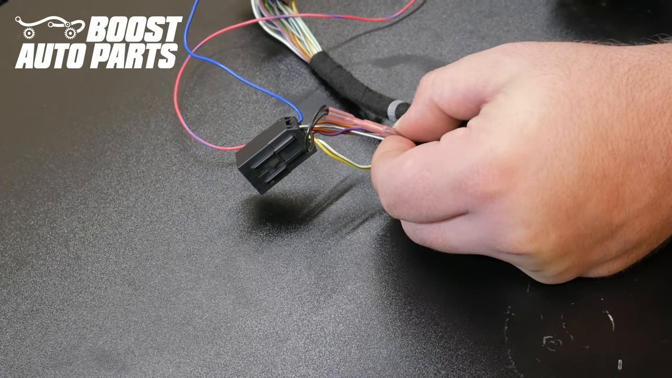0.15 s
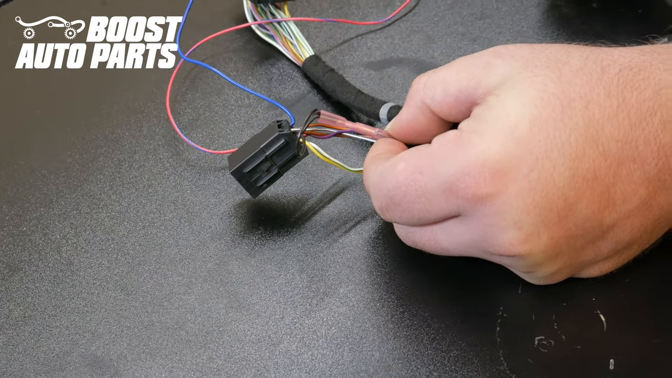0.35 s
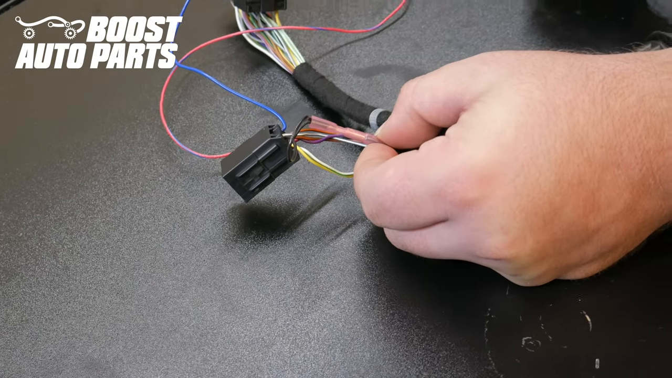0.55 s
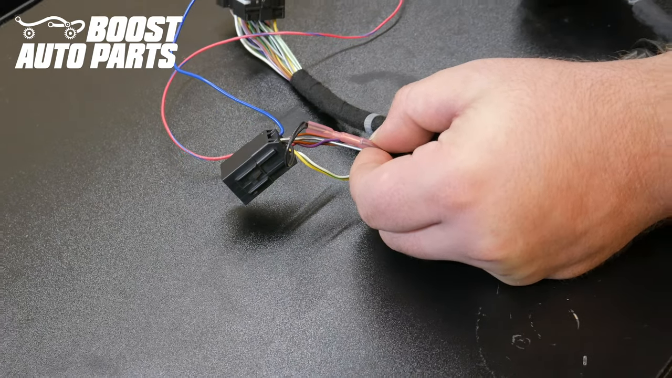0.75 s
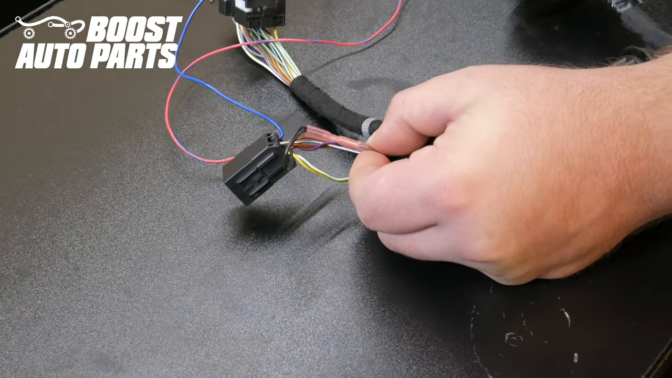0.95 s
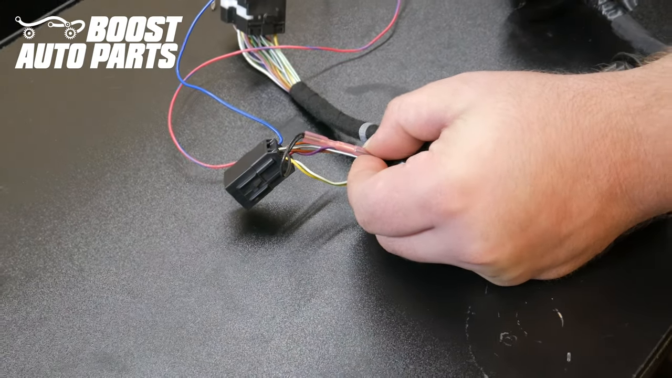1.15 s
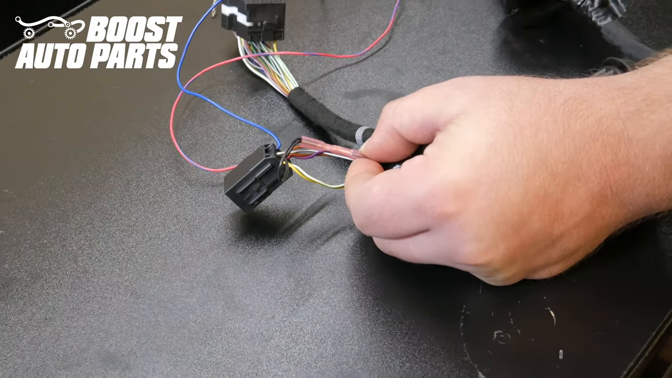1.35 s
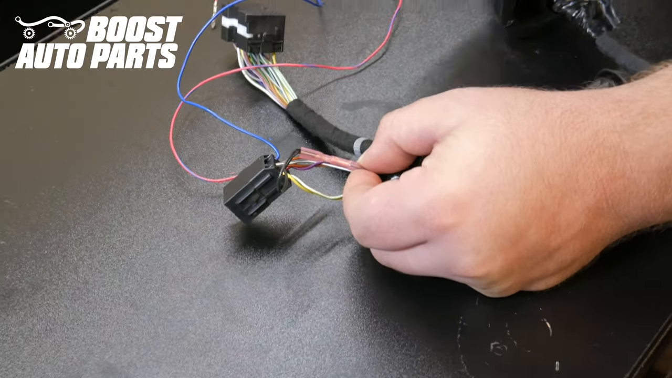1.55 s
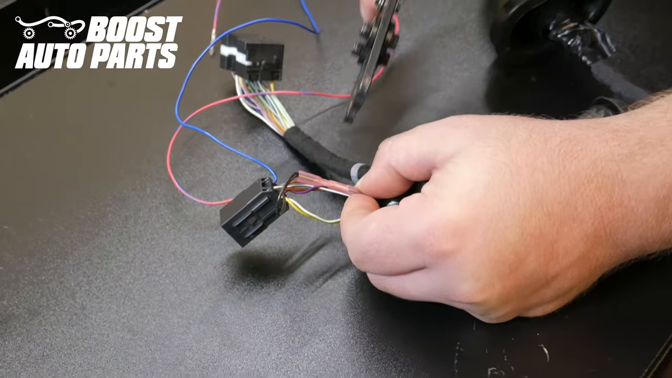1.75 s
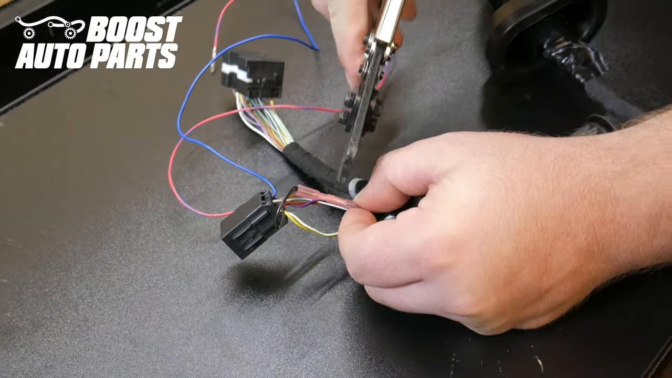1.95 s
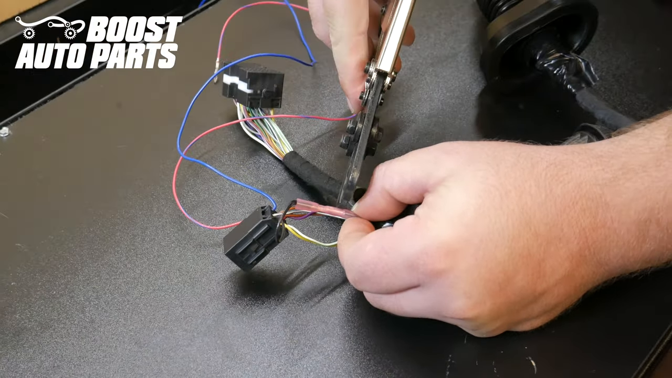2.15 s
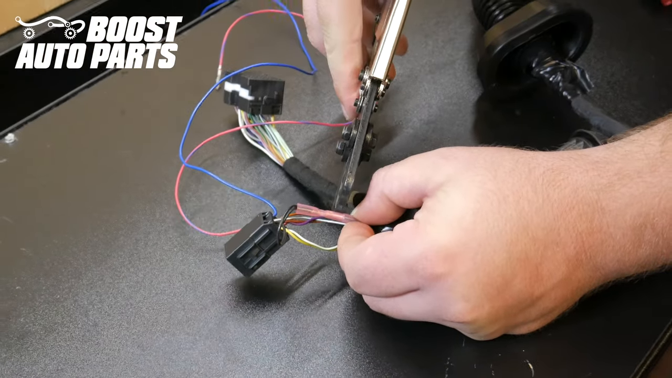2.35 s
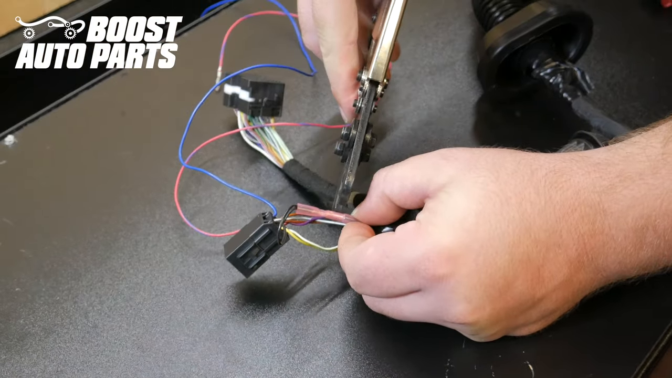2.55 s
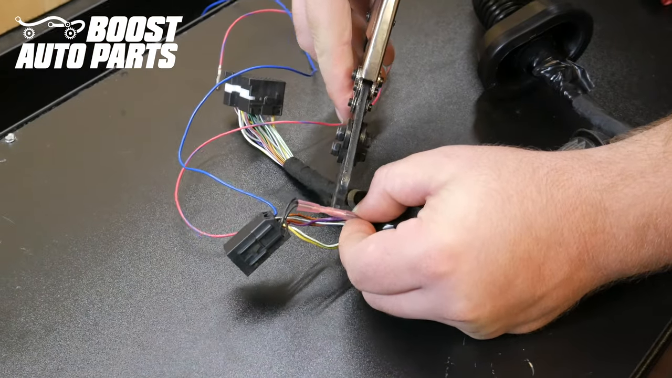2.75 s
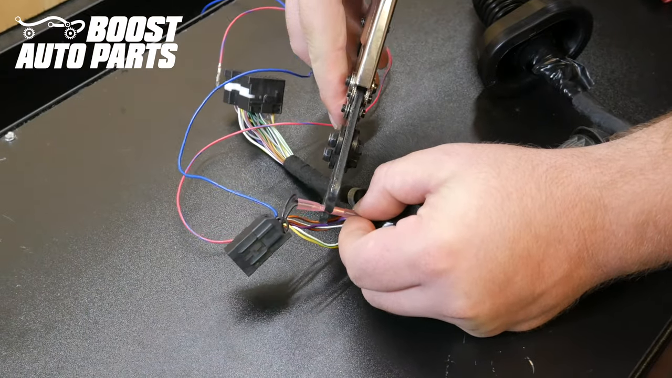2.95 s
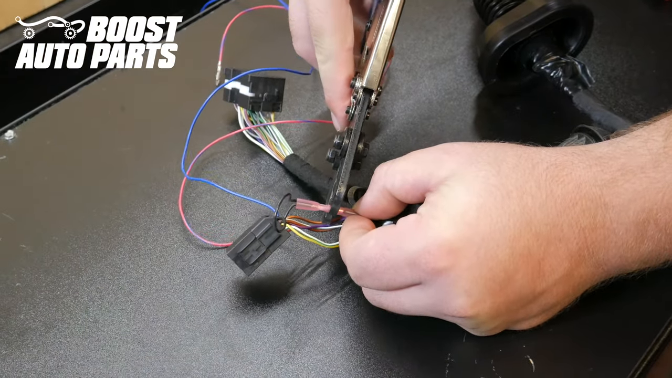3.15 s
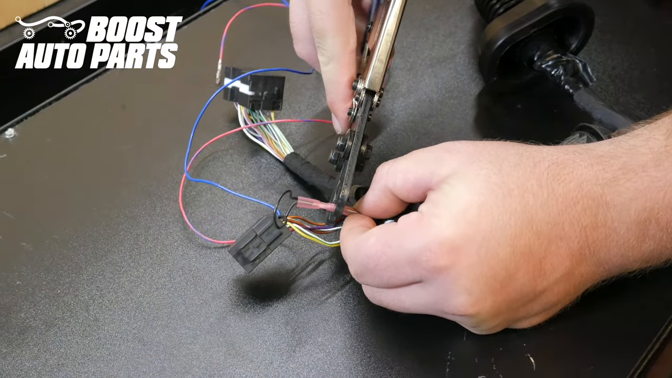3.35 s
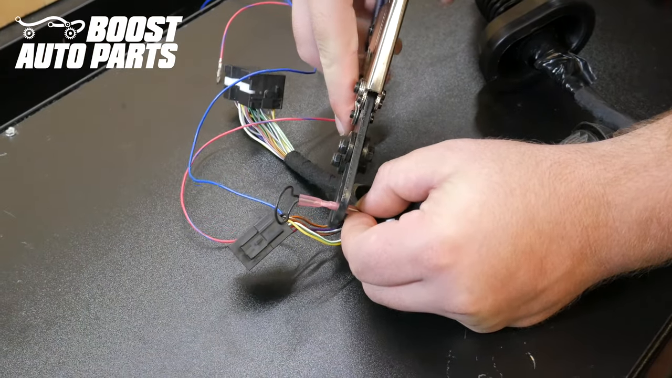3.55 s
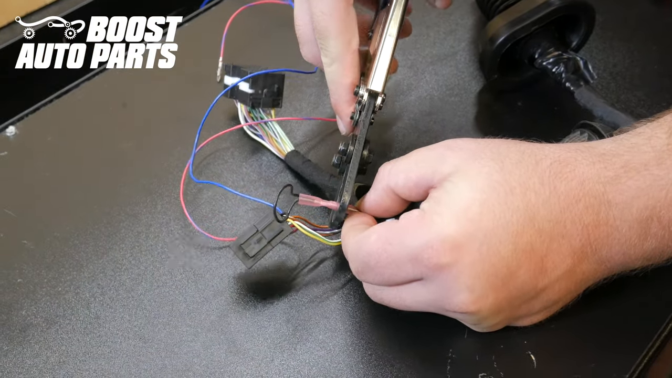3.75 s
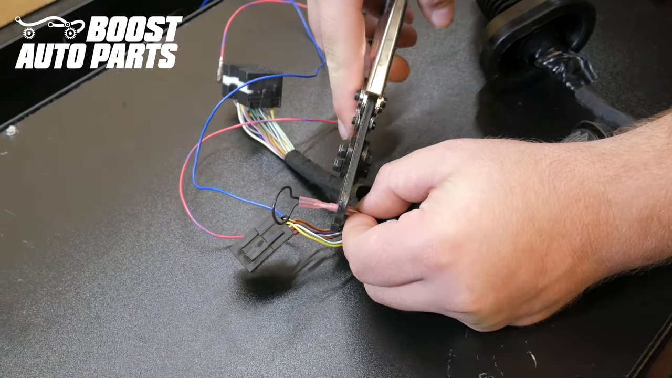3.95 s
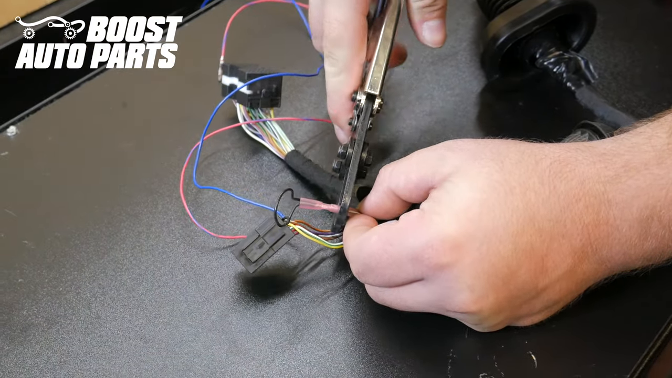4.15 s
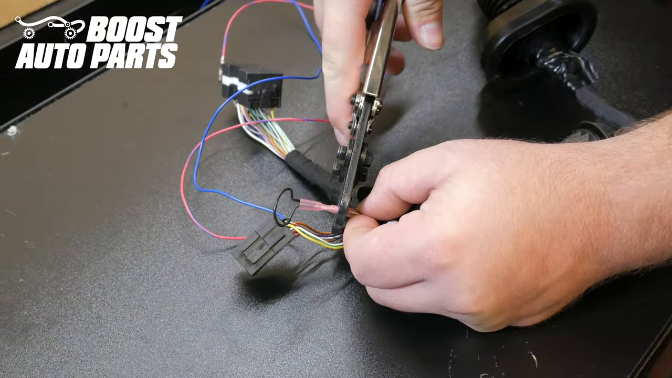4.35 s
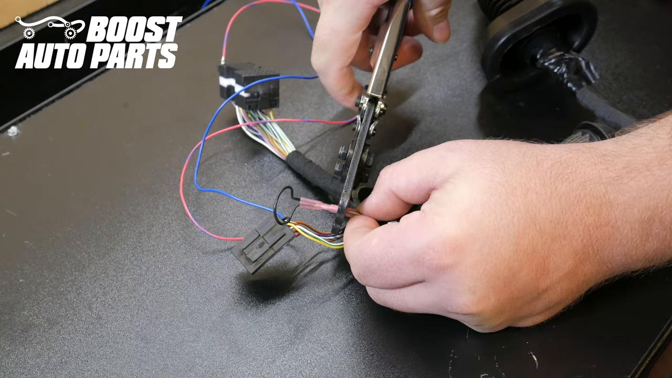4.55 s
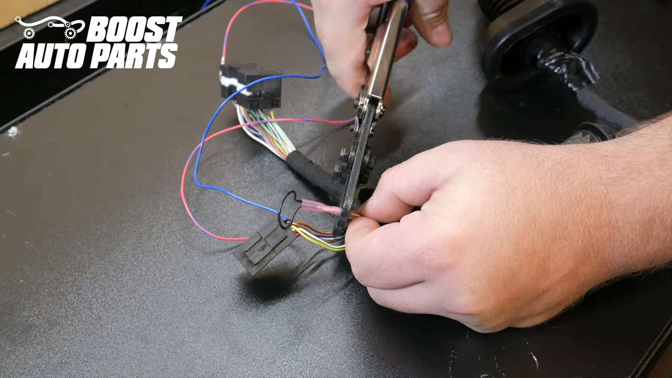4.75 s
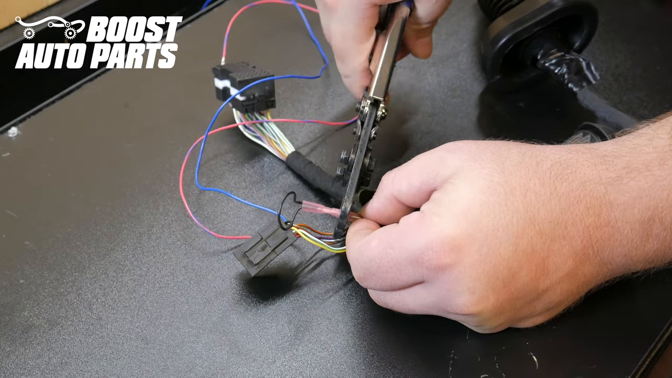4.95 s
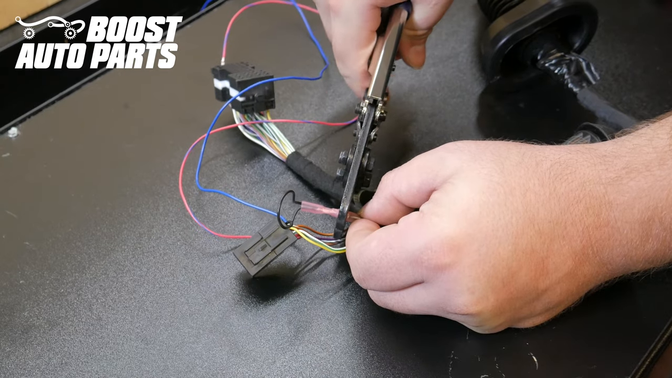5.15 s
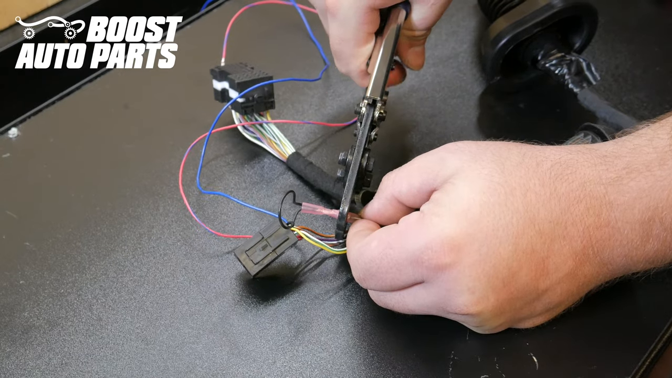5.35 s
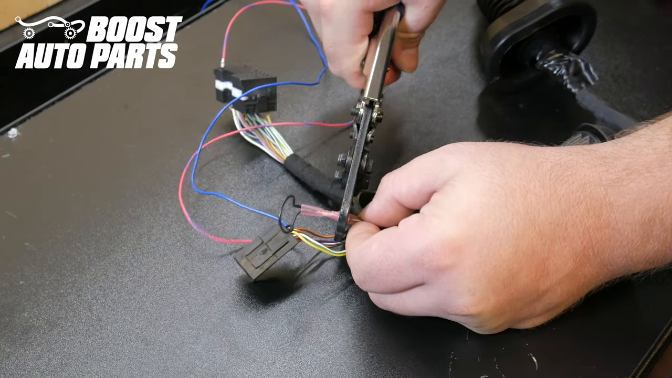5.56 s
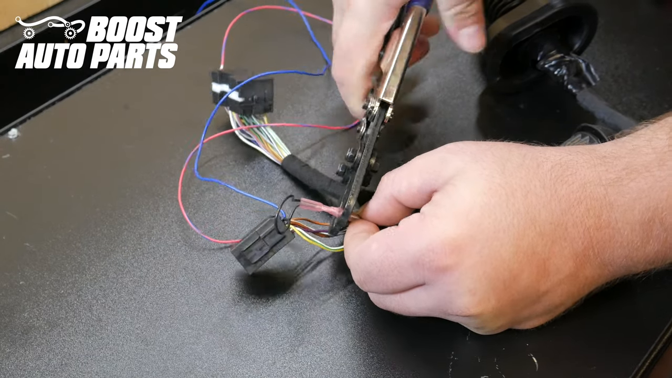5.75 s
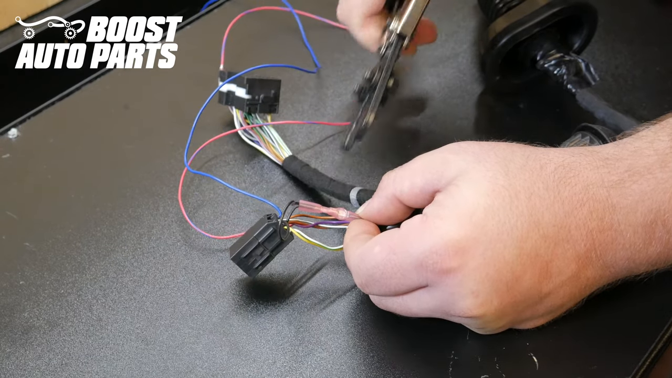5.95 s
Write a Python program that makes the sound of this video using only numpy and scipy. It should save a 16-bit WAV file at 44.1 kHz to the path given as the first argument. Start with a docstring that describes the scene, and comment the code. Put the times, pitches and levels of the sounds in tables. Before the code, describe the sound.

Wires and plastic plugs tick and knock on a bench, then a ratcheting crimper snaps in sharp metallic clicks over faint ventilation rumble.

```python
"""Wires and plugs tick, drag and knock on a bench top, over the rumble of ventilation in a quiet workshop.
Then a ratchet crimping tool is worked on a wire connector: its pawl snaps over steel teeth.
Snaps are impulses with noise tails and ringing steel modes; they set the return spring singing, built from
sines. Knocks ring the modes of the bench, plastic ticks are short noise bursts, single resonances stand out
in some of the hits, and drag, rustle and air are shaped noise."""
import sys
import numpy as np
from scipy import signal
from scipy.fft import rfft, irfft
from scipy.io import wavfile

SR = 44100
rng = np.random.default_rng(int(sys.argv[2]) if len(sys.argv) > 2 else 0)


def digitize_waveform(pressure):
    """Quantize a signal to 16-bit integers and store it at the path in sys.argv[1].

    Rows of a 2-D input are taken as channels; values are limited to [-1, 1].
    """
    field = np.atleast_2d(pressure).T
    bounded = np.clip(field, -1, 1)
    quanta = np.round(bounded * 32767).astype(np.int16)
    wavfile.write(sys.argv[1], SR, quanta)


def field_ratio(decibels):
    """Amplitude ratio for a level in dB (20 dB per decade); scalars and array-likes work."""
    return 10 ** (np.asarray(decibels, dtype=float) / 20)


N = 268569   # length in samples


def rms_one(x):
    """Scales a signal to rms 1."""
    return x / np.sqrt(np.mean(x ** 2) + 1e-20)


def in_time(rows):
    """Draws straight lines through rows of (start_s, values...), one curve per value."""
    start_s, *columns = np.transpose(rows)
    return [np.interp(np.arange(N) / SR, start_s, column) for column in columns]


def at_hz(points, hz):
    """Reads a curve of (freq_hz, value) points on a log frequency axis."""
    points = np.array(points)
    return np.interp(np.log(hz), np.log(points[:, 0]), points[:, 1])


def band(x, low_hz, high_hz, order=2):
    """Butterworth band-pass."""
    return signal.sosfilt(signal.butter(order, [low_hz, high_hz], "band", fs=SR, output="sos"), x)


def train(seconds, sizes):
    """Impulses of the given sizes at the given times."""
    clicks = np.full(N, 1e-18)
    np.add.at(clicks, np.round(np.asarray(seconds) * SR).astype(int), sizes)
    return clicks


def dying(clicks, t60_s):
    """Each click starts an envelope that falls 60 dB in t60_s."""
    return signal.lfilter([1], [1, -field_ratio(-60 / (t60_s * SR))], clicks)


def ring(clicks, hz, t60_s):
    """A two-pole resonator: a unit click sets a decaying sine of height 1 ringing."""
    radius, angle = field_ratio(-60 / (t60_s * SR)), 2 * np.pi * hz / SR
    return signal.lfilter([0, np.sin(angle)], [1, -2 * radius * np.cos(angle), radius ** 2], clicks)


def drift(rate_hz):
    """Slow random wander of rms 1."""
    r = np.exp(-2 * np.pi * rate_hz / SR)
    wander = signal.lfilter([1], [1, -2 * r, r * r], rng.standard_normal(N + SR))
    return rms_one(wander[SR:])   # the first second lets the filter settle


def stereo_noise(alike):
    """White noise whose channels are correlated by alike, 0-1."""
    mid, side = rng.standard_normal((2, N))
    return np.sqrt((1 + alike) / 2) * mid + np.sqrt((1 - alike) / 2) * side * [[1], [-1]]


def coloured(spectrum, noise):
    """Noise shaped by a spectrum of (freq_hz, level_db); rms 1."""
    hz = np.maximum(np.arange(N // 2 + 1) * SR / N, 1)
    return rms_one(irfft(rfft(noise) * field_ratio(at_hz(spectrum, hz)), N))


def peaked(noise, peaks):
    """Noise with resonances (freq_hz, level_db, width_hz) laid on it; rms 1."""
    hz = np.arange(N // 2 + 1) * SR / N
    lift = sum(field_ratio(db) / np.sqrt(1 + (2 * (hz - centre) / width) ** 4) for centre, db, width in peaks)
    return rms_one(irfft(rfft(noise) * (1 + lift), N))


def grains(per_s, spread_db, t60_s):
    """Uneven slips: a bumpy envelope of rms 1 with rounded fronts."""
    heights = field_ratio(spread_db * np.minimum(rng.exponential(1, N), 4))
    born = (rng.random(N) < per_s / SR) * heights
    return rms_one(dying(dying(born + 1e-18, t60_s), 0.04))


LONGEST_RING_S = 0.13   # hands on tool and bench damp every struck mode


def struck(seconds, levels_db, modes, spread_db, lean_db):
    """Every blow gives each mode a new strength; each mode radiates a little to one side."""
    chance, side = rng.standard_normal(levels_db.shape), rng.standard_normal(len(modes))
    sizes = field_ratio(levels_db + spread_db * chance)
    out = 0
    for k, (hz, db, t60_s) in enumerate(modes):
        clicks = train(seconds, sizes[:, k] * field_ratio(db) * (-1) ** k)   # neighbours in opposite polarity
        lean = field_ratio(lean_db * side[k] * np.array([[1], [-1]]))
        out = out + ring(clicks, hz, min(t60_s, LONGEST_RING_S)) * lean
    return out


# bands in which snaps and ticks are built: low_hz, high_hz
BANDS = [(1650, 2900), (2900, 5000), (5000, 9200), (9200, 12000), (12000, 15500)]
# decay time in each band as a factor of the stage's t60
SHORTENING = [0.76, 0.62, 0.82, 0.49, 0.48]
# returns from nearby surfaces: delay_s, level_db
ECHOES = [(.0045, -13), (.0085, -11), (.016, -16)]
REBOUND_S = 0.00052


def snaps(rows, crack_db, stages, noises):
    """Per band a bare crack, then clatter, near echoes and room tail.
    rows: start_s, level_db in each band; stages: level_db, t60_s."""
    out = 0
    for k, (low, high) in enumerate(BANDS):
        clicks = train(rows[:, 0], field_ratio(rows[:, k + 1]) * np.sqrt(SR / 2 / (high - low)))
        echoed = clicks + sum(field_ratio(db) * np.roll(clicks, round(lag * SR)) for lag, db in ECHOES)
        body = 0
        for (db, t60_s), noise in zip(stages, noises):
            # each band decays at its own rate, as air and walls swallow sound
            body = body + field_ratio(db) * dying(echoed, t60_s * SHORTENING[k]) * noise
        crack = clicks + 0.16 * np.roll(clicks, round(REBOUND_S * SR))   # the contact rebounds at once
        out = out + band(body + field_ratio(crack_db) * crack, low, high, order=3) * (-1) ** k
    return out


# pawl on teeth: start_s, level_db, load on the jaws (0-1), edge_db (fourth band), sizzle_db (top band)
PAWL = [(3.6732, -19.5, 0.2, 0, -3), (3.6987, -19.5, 0.02, -5.5, -3.5), (3.725, -21, 0, -2.5, -3.5),
        (3.7778, -21.5, 0, -3, -5), (4.0394, -19, 0.2, -6, 0.5), (4.1034, -18.5, 0.62, -4.5, -2.5),
        (4.613, -19.5, 0.58, 1, -1), (4.792, -51, 1, 2.5, -0.5), (4.8023, -19.5, 0.6, -6, -2),
        (4.903, -21.5, 0.75, 0.5, 2), (4.958, -21.5, 0.6, -3, 0.5), (5.023, -22, 0.78, 1.5, -3.5),
        (5.105, -22, 0.83, 3, 0.5), (5.3531, -29, 0.4, -3, -7), (5.357, -36.5, 0.44, -7, -5),
        (5.793, -13.5, 0.6, -0.5, -9), (5.806, -21.5, 0.42, -8, -12), (5.850, -19, 0.5, 1.5, 0),
        (5.872, -23, 0.25, 2, 0.5), (5.88, -26, 0.8, 5, -2), (5.888, -25, 0.7, -6, -5),
        (5.8957, -23, 0.87, -5, -6), (5.9103, -32, 0.8, 3, 1), (5.93, -24.5, 0.56, 2, -3),
        (5.945, -28.5, 0, 4.5, 1.5), (5.9586, -26.5, 0.7, 4.5, -3), (5.9702, -25.5, 0.9, 0.5, -2.5),
        (5.982, -25, 0.8, -12, -10.5)]
# colour of a snap in the five BANDS, jaws free to ring: level_db
FREE_DB = [-19, -1.5, -4, 1, 1]
# the same with jaws clamped on the connector: level_db
CLAMPED_DB = [-10, -12.5, 0, -1.5, -1]
# broad humps of the snap: freq_hz, level_db, width_hz
JAWS = [(3760, 0, 870), (10700, -12.5, 1800), (12800, -1.5, 850), (14300, 11, 880)]
# steel modes of jaws and handles: pitch_hz, level_db, t60_s
STEEL = [(1990, -0.5, 0.08), (2620, 6, 0.04), (3200, -0.5, 0.026), (3450, -2.5, 0.044), (3707, 1.5, 0.036),
         (3870, -18.5, 0.089), (4000, -19, 0.042), (4180, -5.5, 0.05), (4430, -26, 0.065),
         (5300, -10, 0.026), (5510, -3.5, .05), (5670, -20.5, .08), (6670, -20, 0.05), (8060, -6, .015),
         (8840, 2.5, 0.015), (9580, -6, 0.025), (10350, 8.5, 0.01), (9960, -8.5, 0.01), (12300, 14.5, .012),
         (12600, 2, .015), (14820, 11.5, 0.013)]


def pawl():
    """The pawl snaps and strikes the steel modes; load on the jaws moves the colour, edge and sizzle the top."""
    start_s, level_db, load, edge_db, sizzle_db = np.transpose(PAWL)[:, :, None]
    lift_db = np.hstack([0 * start_s, 0 * start_s, 0 * start_s, edge_db, sizzle_db])
    colour_db = (1 - load) * FREE_DB + load * CLAMPED_DB
    rows = np.hstack([start_s, level_db + colour_db + lift_db])
    noises = [peaked(stereo_noise(alike), JAWS) for alike in (0.95, 0.9, 0.82)]
    stages = [(3.0, 0.012), (-6.0, 0.052), (-19, 0.28), (-42.5, 0.78)]
    out = snaps(rows, 18.4, stages, noises + noises[:1])

    # each steel mode follows the level of the band it lies in
    columns = 1 + np.searchsorted([low for low, high in BANDS[1:]], [hz for hz, db, t60_s in STEEL])
    out = out + struck(rows[:, 0], rows[:, columns] - 4, STEEL, spread_db=2.5, lean_db=2.06)

    # dense ring of the handles, weaker when the jaws are clamped
    handles_db = (1 - load) * -21.5 + load * -28
    shaken = train(start_s[:, 0], field_ratio(level_db + handles_db)[:, 0])
    out = out + dying(shaken, 0.18) * rms_one(band(noises[1], 3280, 4100, order=3))
    return band(out, 980, 12900, order=3)   # a small object radiates no bass


# return spring free to sing: start_s, damped_s, pitch_hz, level_db per jolt, overtones_db, t60_s
STROKES = [(3.673, 4.095, 756, -53, 2, 1.73), (4.596, 5.095, 752, -58, 1, 1.7),
           (5.836, 6.09, 750, -67, -24, 1.2)]
# overtones of the spring: multiple of the pitch, level_db
COILS = [(2.0, -20.5), (2.99, -19), (4.0, -27.5), (5.0, -15), (5.975, -25.5), (7.0, -20.5), (8.0, -23.5),
         (9.0, -24), (10.01, -23), (11.0, -21), (12.0, -18), (13.0, -12), (14.0, -16), (14.97, -30.5)]
SWELL_S, DAMPING_S = 0.014, 0.021   # a jolt spreads along the coil; a hand stops it
SLACK_HZ, TIGHTEN_S = 9.0, 0.032   # the pitch starts low and rises as the coil is stretched
KNOCK_JOLT_DB, OVERTONE_LAG = 3, 2.5   # a knock's jolt; overtones swell this many times slower


def spring():
    """Teeth and knocks jolt the coil into nearly harmonic standing waves; the overtones beat and flutter."""
    t, out = np.arange(N) / SR, 0
    # jolts carry energy, so levels count twice
    jolts = train([row[0] for row in PAWL], 0.86)
    jolts = jolts + train([row[0] for row in KNOCKS], field_ratio(2 * KNOCK_JOLT_DB))
    phases = rng.uniform(0, 2 * np.pi, len(COILS))
    waver = field_ratio(1.4 * drift(8))
    flutter = [field_ratio(db - 3.0 + 5.0 * drift(14)) for multiple, db in COILS]
    for begin, end, hz, db, over_db, t60_s in STROKES:
        free = jolts * (t >= begin) * (t < end)
        held = np.exp(-np.maximum(t - end, 0) / DAMPING_S)
        pitch_hz = hz - SLACK_HZ * np.exp(-np.maximum(t - begin, 0) / TIGHTEN_S)
        turn = 2 * np.pi * np.cumsum(pitch_hz) / SR
        overtones = sum(level * np.sin(multiple * turn + phase)
                        for (multiple, _), level, phase in zip(COILS, flutter, phases))
        energy = dying(free, t60_s / 2)   # its square root falls 60 dB in t60_s
        lags = [np.exp(-1 / (SWELL_S * slower * SR)) for slower in (1, OVERTONE_LAG)]
        low, high = [np.sqrt(signal.lfilter([1 - r], [1, -r], energy)) for r in lags]
        tone = low * waver * np.sin(turn) + field_ratio(over_db) * high * overtones
        out = out + np.sqrt(2) * field_ratio(db) * held * tone
    return out


# knocks on the bench top: start_s, level_db, centre_hz, reach_octaves (0.2 at least), t60_s
KNOCKS = [(.004, -28, 750, 0.96, 0.063), (.08, -36, 750, 0.21, 0.24), (.097, -39, 720, 0.13, 0.15),
          (.192, -43, 700, 0.31, .05), (.2365, -25, 583, 0.3, 0.074), (0.293, -18.5, 324, 0.59, 0.094),
          (0.31, -13, 310, 0.76, 0.73), (.384, -12.5, 410, 0.35, 0.12), (.405, -14, 2140, 0.34, 0.092),
          (.411, -11, 550, 0.51, 0.095), (0.421, -16, 1100, 1, 0.16), (.431, -15.5, 596, 0.83, 0.055),
          (.445, -20.5, 1510, 0.48, 0.13), (.51, -27, 584, 1.6, 0.18), (.731, -35.5, 600, 1.1, 0.13),
          (1.37, -29, 1390, 2, 0.25), (4.065, -31, 750, 1.22, 0.24), (4.934, -21.5, 750, 1.12, 0.096),
          (4.962, -27.5, 850, 0.17, 0.42), (5.24, -42, 990, 0.52, 0.16), (5.482, -37, 795, 0.47, 0.17),
          (5.576, -17.5, 825, 0.6, 0.034), (5.581, -8.5, 797, 0.18, 0.064), (5.62, -8, 1090, 2.35, 0.24),
          (5.622, -8, 357, 0.4, 0.091), (5.634, -20, 390, 0.28, 0.15), (5.645, -11.5, 950, 0.52, 0.13),
          (5.855, -32.5, 930, 0.59, 0.58)]
# modes of the bench top: pitch_hz, level_db, t60_s (before the cap on struck modes)
BENCH = [(277, 2, 0.19), (385.3, -1, 0.16), (506, -19, 0.069), (651, -16, 0.066), (750, -4, 0.062),
         (826.5, -8.5, 0.15), (968, -9, 0.15), (1100, -10, 0.11), (1263, -6, 0.08), (1396, -12.5, 0.14),
         (1722, -4.5, 0.07), (2030, -9.5, 0.092), (2300, -2.5, 0.05), (2450, -8, 0.05), (3610, -2, 0.093)]


def knocks():
    """A soft blow rings the bench modes near its centre; the room smears it into a dull puff."""
    start_s, level_db, centre_hz, octaves, t60_s = np.transpose(KNOCKS)
    octaves = np.maximum(octaves, 0.2)
    away = np.log2(np.array(BENCH)[:, 0] / centre_hz[:, None]) / octaves[:, None]
    modes_db = level_db[:, None] - 13.5 - 6 * away ** 2
    out = struck(start_s, modes_db, BENCH, spread_db=4.0, lean_db=2.5)
    noise = bench_noise()
    for start, db, centre, reach, decay_s in zip(start_s, level_db, centre_hz, octaves, t60_s):
        puff = dying(train([start], field_ratio(db - 13.0)), decay_s) * noise
        out = out + band(puff, centre / 2 ** reach, centre * 2 ** reach)
    return band(out, 220, 4600)


# spectrum of rubbing on the bench: freq_hz, level_db per Hz
DRAG = [(88, -8), (150, 3.5), (303, -3), (339, -2.5), (375, -2), (650, 1.5), (996, -7.5), (2280, -14),
        (3000, -57), (3900, -53), (6600, -120)]


def bench_noise():
    """Rubbing and room smear carry the bench modes."""
    return peaked(coloured(DRAG, stereo_noise(0.84)), [(hz, 4.0, 60.0) for hz, db, t60_s in BENCH])


# wires and plugs ticking: start_s, level_db, centre_hz, reach_octaves
TICKS = [(0.0032, -31, 1960, 0.25), (0.077, -45, 2240, 0.32), (0.166, -51, 2400, 1),
         (0.1927, -41.5, 2480, 2.5), (0.213, -46, 3400, 0.6), (0.3507, -31.5, 2100, 0.43),
         (0.4059, -48, 7000, 0.92), (0.47, -50, 6000, 0.66), (0.51, -31.5, 12600, 1.9),
         (0.73, -42, 2100, 0.36), (0.9995, -39.5, 9700, 0.98), (1.006, -48.5, 2500, 0.8),
         (1.0527, -42, 7960, 0.9), (1.069, -43, 7950, 1.3), (1.136, -55, 6000, 1.6),
         (1.148, -28.5, 11500, 0.88), (1.3245, -37, 2400, 1.07), (1.3677, -35, 3070, 1.1),
         (1.372, -32.5, 2700, 1.33), (1.5403, -46, 7960, 1.36), (1.978, -56.5, 3600, 1.4),
         (2.1371, -51, 7000, 2), (2.704, -51.5, 11000, 1.3), (2.77, -61, 3000, 2.1),
         (3.1067, -45.5, 3260, 0.72), (4.3864, -50, 4180, 1.1), (5.5224, -52.5, 2200, 0.72),
         (5.62, -26, 2800, 0.98), (5.643, -46, 3600, 1.3)]
# resonances of hollow plug shells: freq_hz, level_db, width_hz
PLUG = [(2430, -39, 60), (3440, -12, 600), (4060, -5.5, 200), (8640, -6, 880)]


def ticks():
    """Plastic lands softer than steel and dies without a ring; each tick falls off on both sides of its centre."""
    start_s, level_db, centre_hz, octaves = np.transpose(TICKS)[:, :, None]
    away = np.log2(np.sqrt(np.prod(BANDS, axis=1)) / centre_hz) / octaves
    rows = np.hstack([start_s, level_db - 6 * away ** 2])
    noises = [peaked(stereo_noise(alike), PLUG) for alike in (0.95, 0.9, 0.8)]
    return snaps(rows, 6, [(-3.5, 0.022), (-10.5, 0.033), (-31, 0.39)], noises)


# single resonances that stand out in some knocks, ticks and snaps: start_s, level_db, pitch_hz, t60_s
RESONANCES = [(0.1925, -32.5, 2390, 0.021), (0.1929, -38.5, 3200, 0.032), (0.352, -35, 2700, .03),
              (0.4055, -29, 2250, .04), (0.4112, -15, 564, 0.035), (0.431, -23.5, 618, .04),
              (0.511, -44, 1700, .05), (1.053, -47, 4100, 0.034), (1.071, -39, 4250, 0.034),
              (1.15, -41.5, 4000, 0.038), (1.149, -46, 1930, 0.033), (1.3682, -30, 1570, 0.022),
              (1.369, -32, 3320, 0.032), (5.354, -23.5, 3200, 0.028), (5.582, -25.5, 774, 0.066),
              (5.6205, -20, 710, 0.042), (5.768, -37, 267, 0.19)]


def resonances():
    """Single resonances stand out in some knocks, ticks and snaps; each rings briefly on one note."""
    notes = sum(ring(train([start], field_ratio(db)), hz, t60_s) for start, db, hz, t60_s in RESONANCES)
    return band(notes, 185, 7400)


# harness moved over the bench, one table per move: start_s, drag_db felt by the top, rustle_db of insulation
MOVES = [
    [(0.05, -69, -72), (0.1, -47.5, -59.5), (0.142, -63, -66), (0.2, -47.5, -56), (0.27, -65, -82)],
    [(0.29, -48, -57), (0.318, -31.5, -45), (0.399, -30, -45), (0.412, -23, -41), (0.43, -26, -50),
     (0.445, -35.5, -53), (0.497, -34.5, -53), (0.528, -37.5, -61), (0.6, -65.5, -65), (0.644, -72, -63.5),
     (0.762, -63, -57), (0.8, -64, -63)],
    [(0.84, -90, -76), (1.1, -90, -72.5), (1.25, -90, -71), (1.45, -90, -71.5), (1.65, -90, -85)],
    [(5.577, -42, -60), (5.59, -32, -56.5), (5.615, -34.5, -73.5), (5.65, -30.5, -45.5), (5.7, -40, -62),
     (5.726, -39.5, -44.5), (5.748, -43, -47), (5.785, -51, -51)],
]
# treble of the rustle in each move: level_db
CRISP_DB = [-2.5, -5, 6.5, 5]
# spectrum of the rustle: freq_hz, level_db
RUSTLE = [(880, -67), (1500, -2.5), (4120, -3), (7760, -11), (10800, -15), (14600, -27), (16000, -52.5)]


def harness():
    """Stick-slip drag rumbles in the bench, insulation rustles above it, dull or crisp."""
    still = [(start, -95, -95, 0) for start in (0.02, 0.82, 1.8, 5.57, 5.83)]
    moving = [(*row, crisp) for move, crisp in zip(MOVES, CRISP_DB) for row in move]
    drag_db, rustle_db, crisp_db = in_time(sorted(still + moving))
    drag = field_ratio(drag_db - 1.5) * grains(560, 0.89, 0.12) * bench_noise()
    rustle = coloured(RUSTLE, stereo_noise(0.87))
    dull = signal.sosfilt(signal.butter(2, 4000, fs=SR, output="sos"), rustle)
    crisp = field_ratio(crisp_db) * (rustle - dull)
    return drag + field_ratio(rustle_db) * grains(900, 2.5, 0.058) * (dull + crisp)


# spectrum of the ventilation: freq_hz, level_db
AIR = [(15, -48), (25, -34), (100, -0.5), (135, 3), (197, -5.5), (296, -4), (510, -16.5), (1390, -25.5),
       (1550, -27.5), (1930, -29.5), (2820, -33), (3600, -36.5), (10100, -41), (14400, -44.5), (16500, -83)]
# left-right likeness of the ventilation: freq_hz, likeness (0-1)
LIKENESS = [(60, 0.96), (180, 0.96), (550, 0.12), (1650, 0.037), (4970, 0.18), (15000, 0.6)]
# faint fan whine: centre_hz, width_hz, level_db
WHINES = [(1930, 27, -76), (2840, 440, -71)]


def air():
    """Ventilation rumble and hiss, its likeness between channels varying with pitch, with faint whines."""
    hz = np.maximum(np.arange(N // 2 + 1) * SR / N, 1)
    alike = at_hz(LIKENESS, hz)
    mid, side = rfft(rng.standard_normal((2, N)))
    mixed = irfft(np.sqrt(1 + alike) * mid + np.sqrt(1 - alike) * side * [[1], [-1]], N)
    whines = sum(field_ratio(db) * rms_one(band(stereo_noise(0.1), centre - width / 2, centre + width / 2))
                 for centre, width, db in WHINES)
    return field_ratio(-47.5) * coloured(AIR, mixed) + whines


def scene():
    """The tool and its spring, the hits on the bench, and the air behind them."""
    return pawl() + spring() + knocks() + ticks() + resonances() + harness() + air()


def roll_off(x):
    """The treble ends steeply here."""
    return signal.sosfilt(signal.butter(12, 16820, fs=SR, output="sos"), x)


def record(dry):
    """A narrow notch at 7.9 kHz lies in the whole sound; the recorder rounds peaks and the top is cut."""
    x = signal.lfilter(*signal.iirnotch(7900, 45, fs=SR), dry)
    ceiling = 1.05   # peaks are rounded towards this height
    x = ceiling * np.tanh(x / ceiling)
    x = signal.sosfilt(signal.butter(6, 16000, fs=SR, output="sos"), x)
    return roll_off(x)


dry = scene()
out = record(dry)
digitize_waveform(out)
```